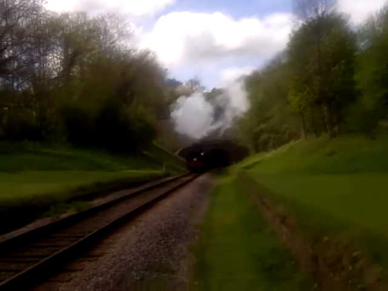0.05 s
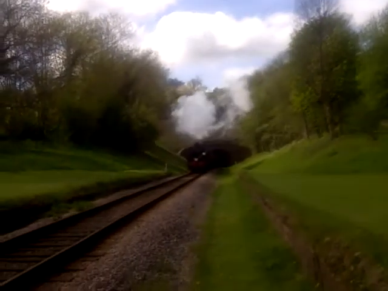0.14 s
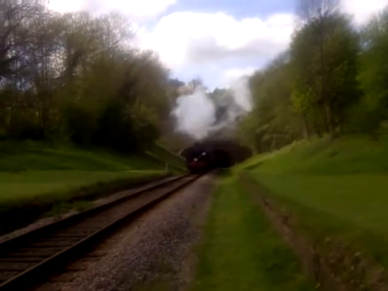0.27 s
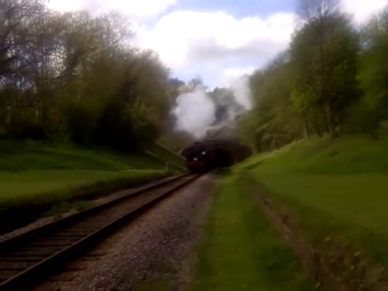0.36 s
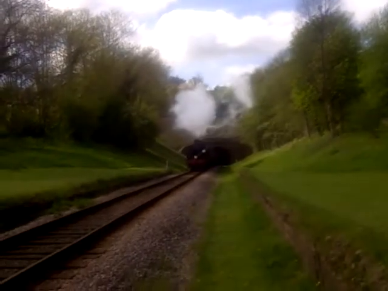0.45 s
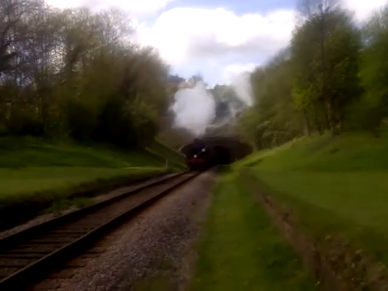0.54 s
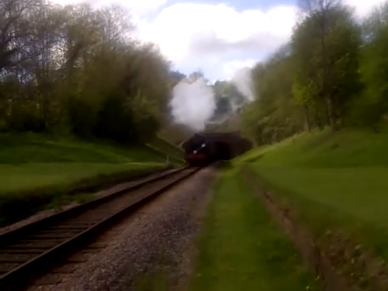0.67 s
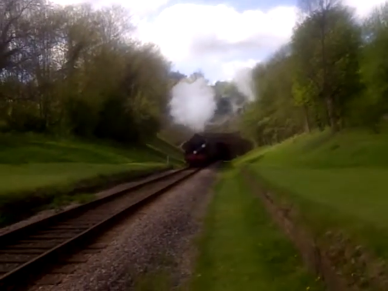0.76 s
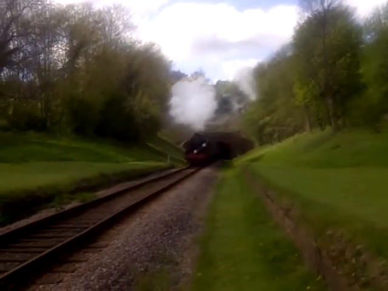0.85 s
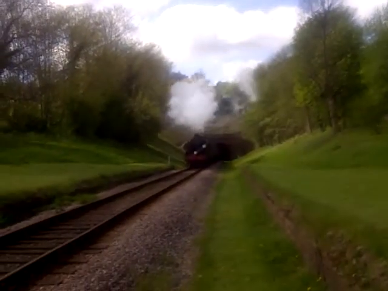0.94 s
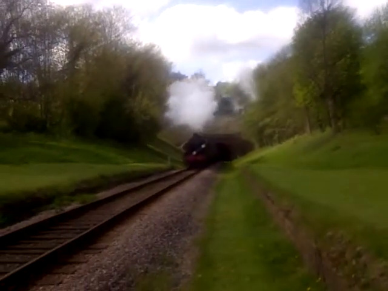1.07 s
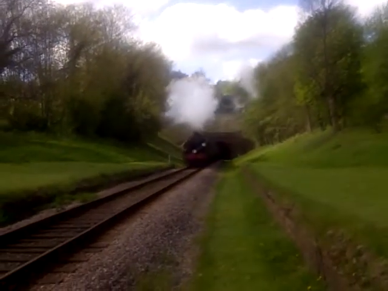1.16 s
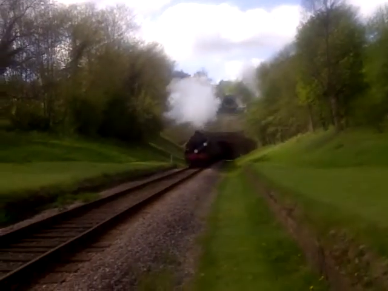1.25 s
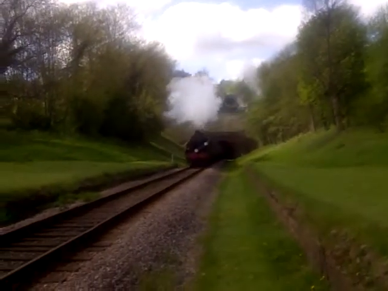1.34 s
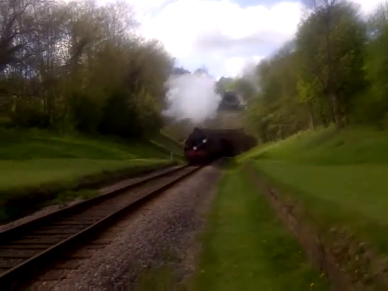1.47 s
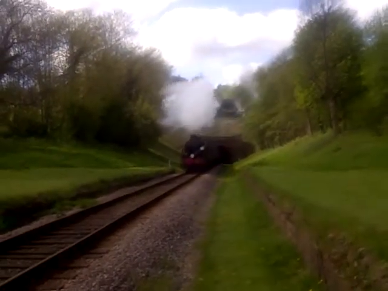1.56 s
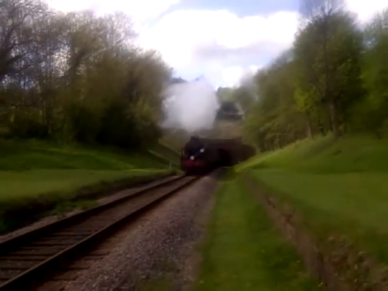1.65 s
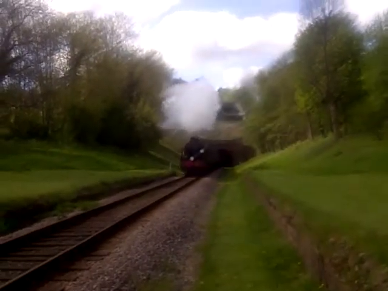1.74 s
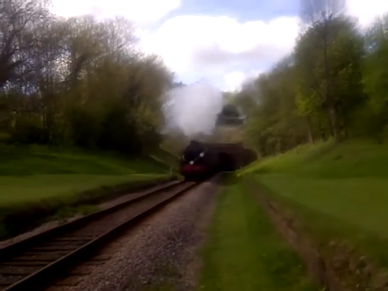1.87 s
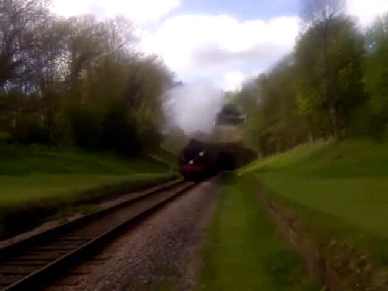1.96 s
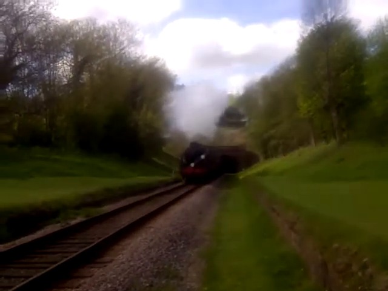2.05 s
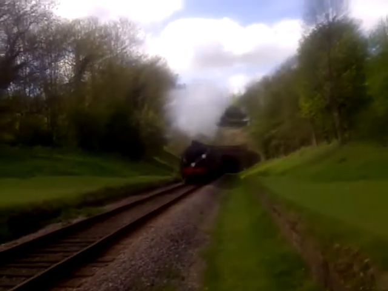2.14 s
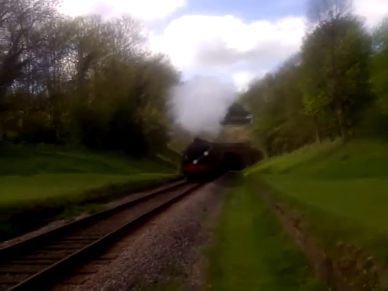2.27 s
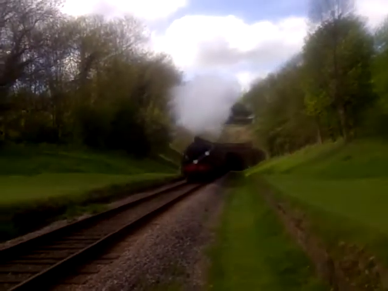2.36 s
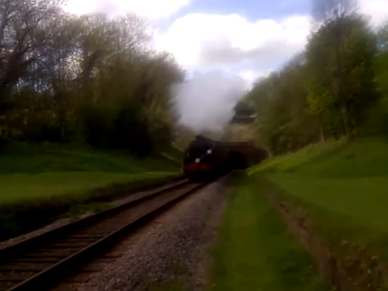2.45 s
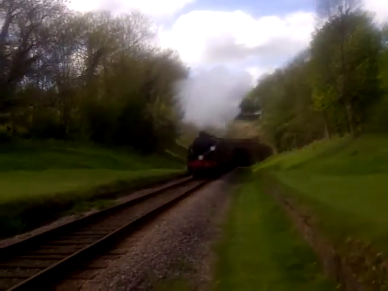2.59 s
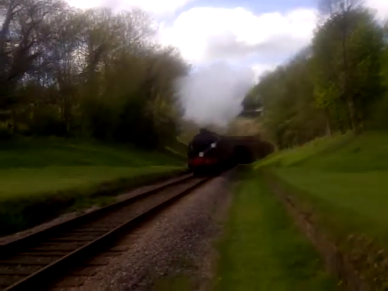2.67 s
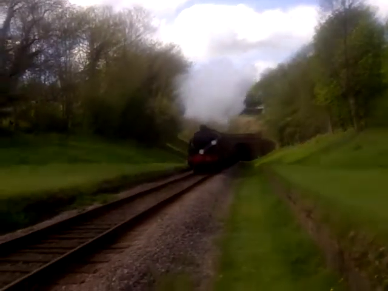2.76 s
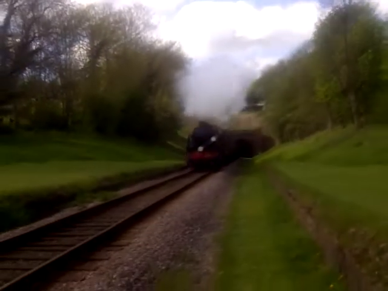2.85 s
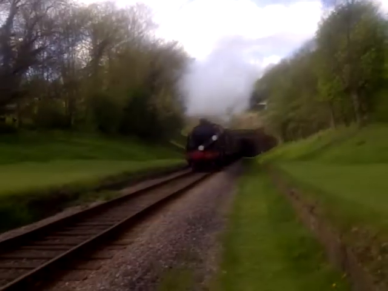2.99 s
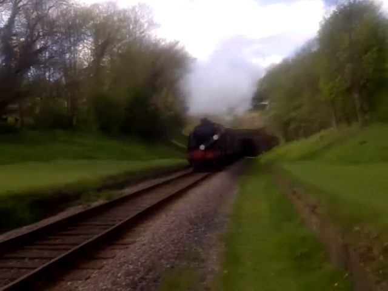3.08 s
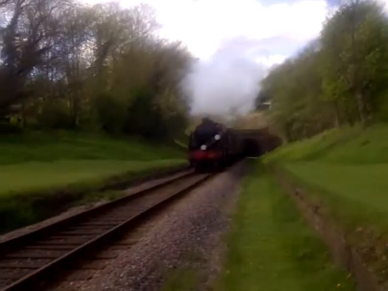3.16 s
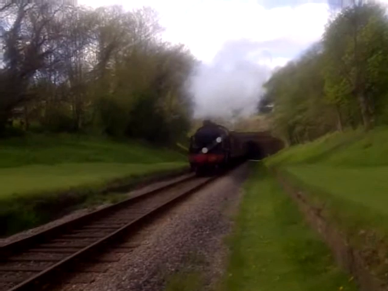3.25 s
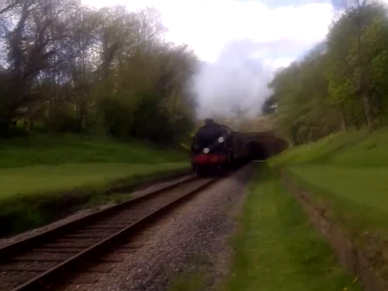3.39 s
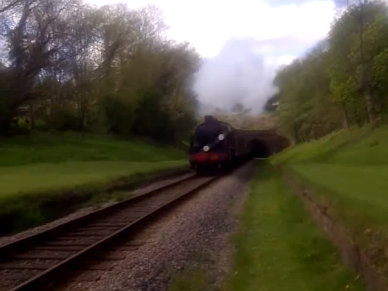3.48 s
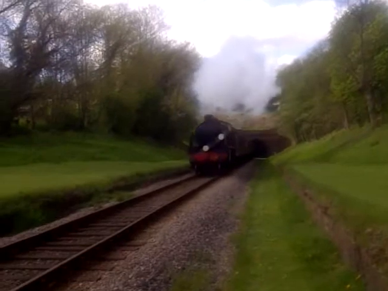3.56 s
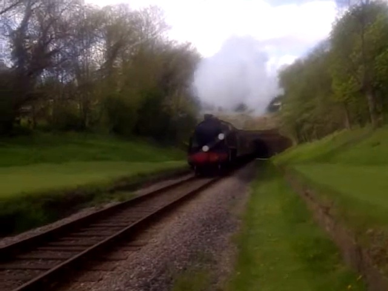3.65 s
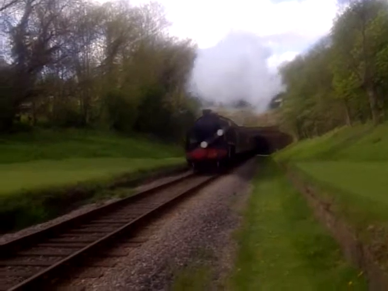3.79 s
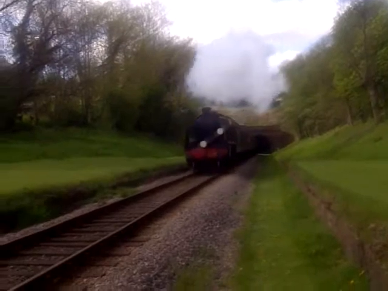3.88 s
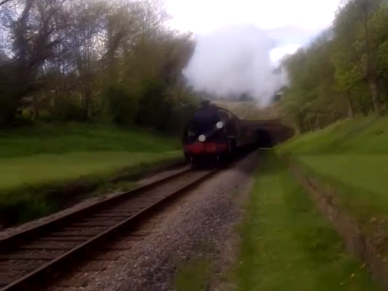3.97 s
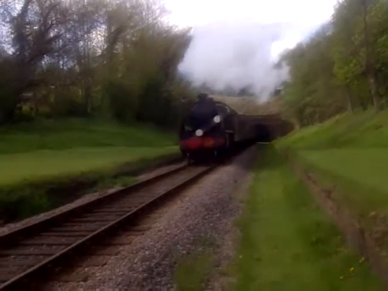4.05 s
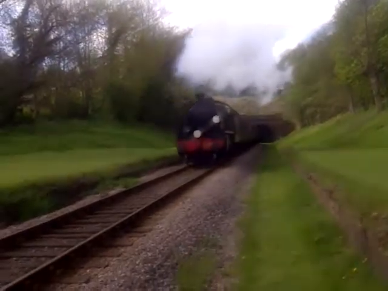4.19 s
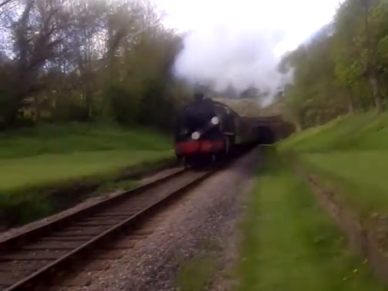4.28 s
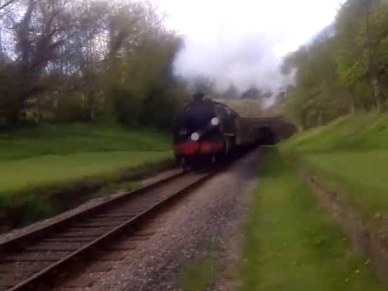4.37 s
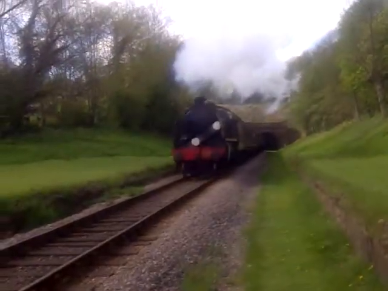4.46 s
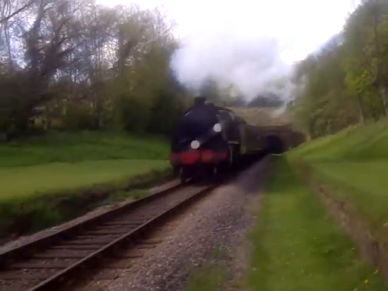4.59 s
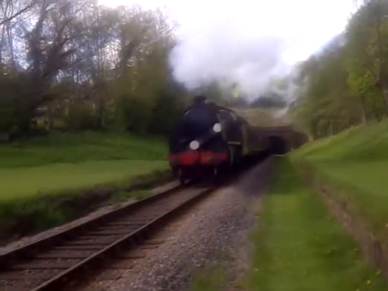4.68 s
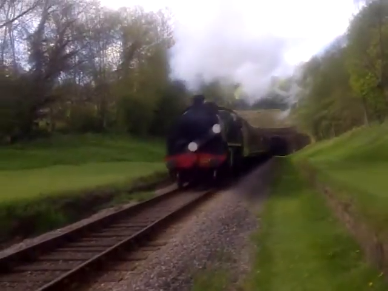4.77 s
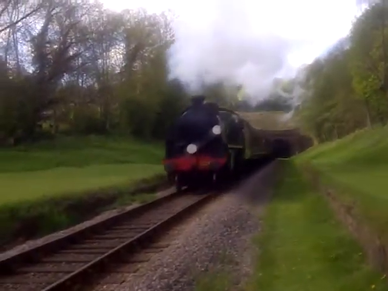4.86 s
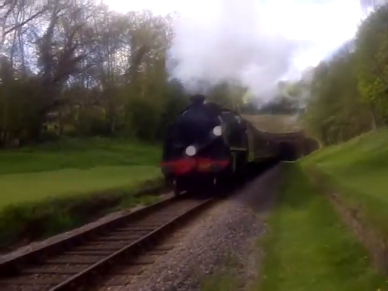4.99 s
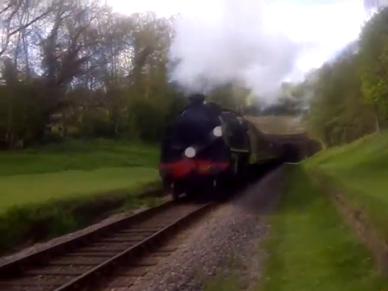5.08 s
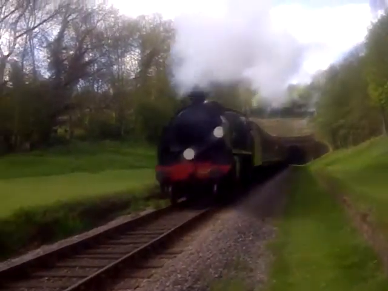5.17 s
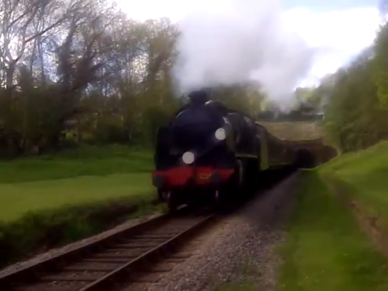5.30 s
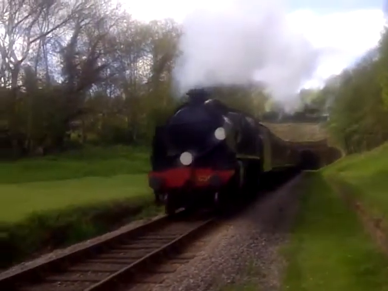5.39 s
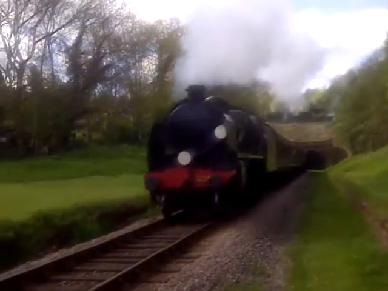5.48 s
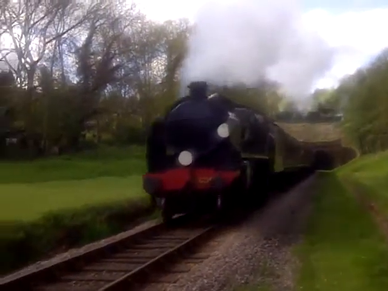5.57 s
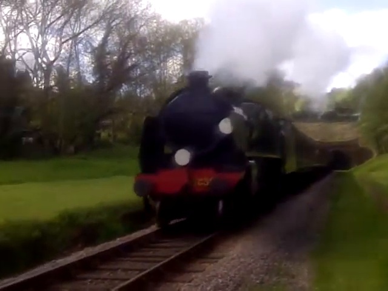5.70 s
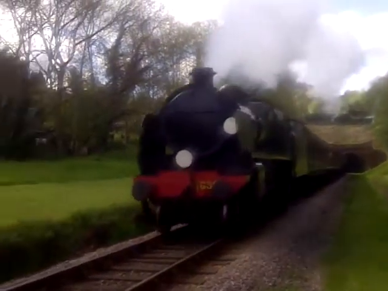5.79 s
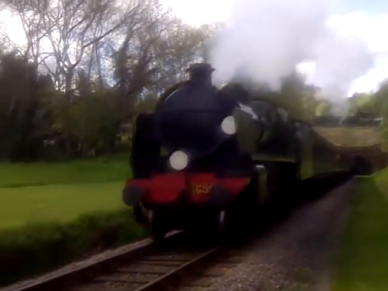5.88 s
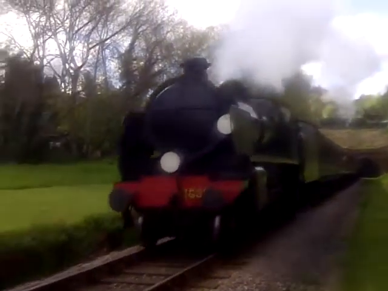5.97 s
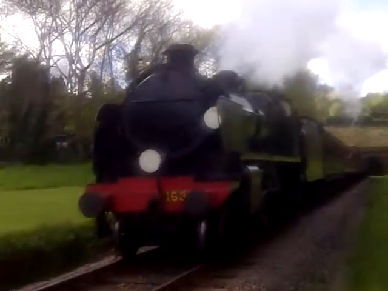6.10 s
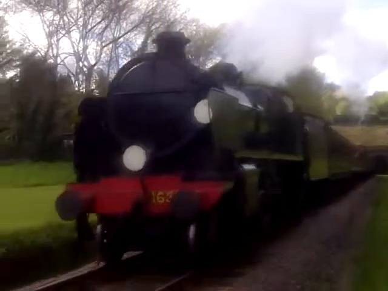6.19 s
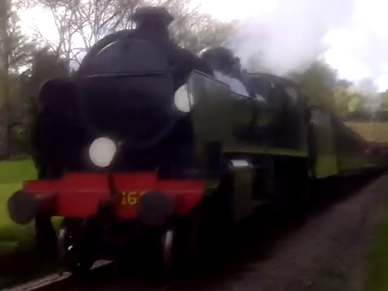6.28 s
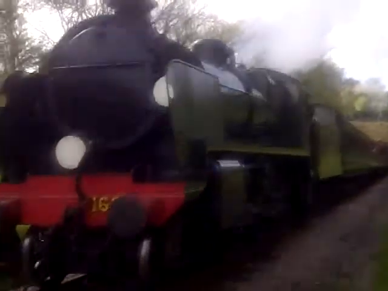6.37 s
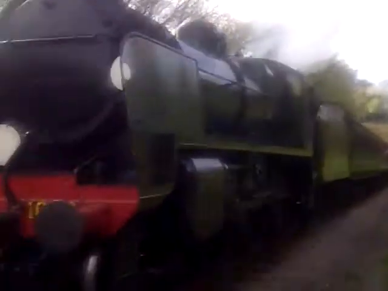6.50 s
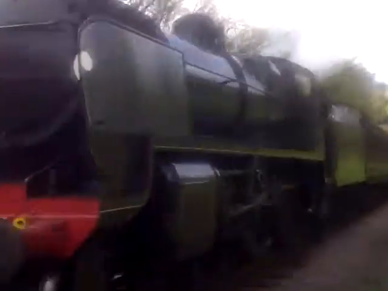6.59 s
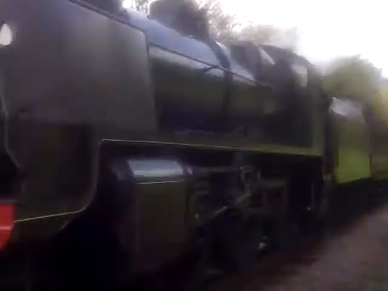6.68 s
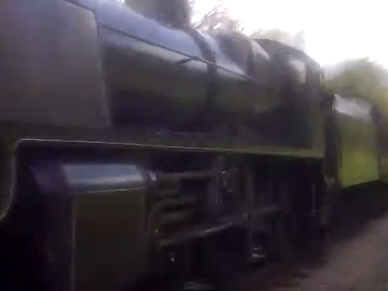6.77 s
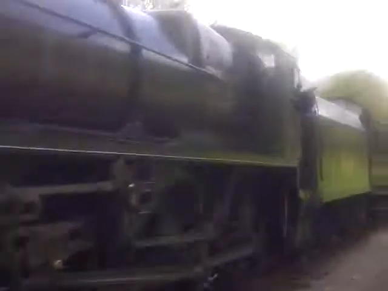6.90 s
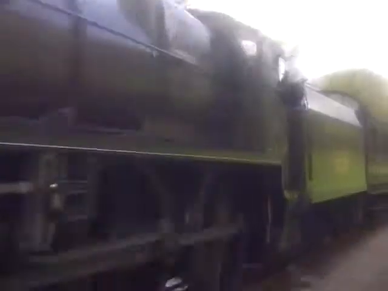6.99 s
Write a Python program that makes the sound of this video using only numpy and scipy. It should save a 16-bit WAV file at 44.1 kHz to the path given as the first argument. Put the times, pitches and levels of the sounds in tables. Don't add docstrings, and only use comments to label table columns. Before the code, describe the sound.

Outdoors beside a railway, quick throaty exhaust puffs bark in groups of four, the first sharpest, over a low rolling rumble that gradually grows. Occasional dry handling ticks sit very near. After about four and a half seconds the puffing fades, rail joints knock, then a hard bang leads into a loud rush of machinery, faint steel pings, low hums and steam hiss, cut off at its loudest. Limited, mono camera sound.

```python
import sys
import numpy as np
from scipy import signal
from scipy.fft import rfft, irfft, next_fast_len
from scipy.io import wavfile
from scipy.ndimage import uniform_filter1d, map_coordinates

SR = 44100
rng = np.random.default_rng(int(sys.argv[2]) if len(sys.argv) > 2 else 0)


def magnitude_from_level(level_db):
    exponent = np.asarray(level_db, float) / 20
    return 10 ** exponent


def int16_out(signal):
    q = np.round(np.clip(np.atleast_2d(signal).T, -1, 1) * 32767)
    wavfile.write(sys.argv[1], SR, q.astype(np.int16))


N = 310464
USUAL_DB = -29.5


def unit(x):
    return x / np.sqrt(np.mean(x ** 2) + 1e-20)


def along(points):
    f, v = np.transpose(points)
    return lambda hz: magnitude_from_level(np.interp(np.log(hz + 1), np.log(f + 1), v))


def resonant(modes):
    def response(f):
        total = 0
        for k, (centre, width, db) in enumerate(modes):
            mode = 1j * f * width / (centre * centre - f * f + 1j * f * width)
            total = total + (-1) ** k * magnitude_from_level(db) * mode
        return total
    return response


def wobble(rate):
    knots = rng.standard_normal(int(N * rate / SR) + 4)
    return map_coordinates(knots, [np.arange(N) * rate / SR])


def filtered(x, response):
    m = next_fast_len(N + SR // 2)
    return irfft(rfft(x, m) * response(np.fft.rfftfreq(m, 1 / SR)), m)[..., :N]


def rush(response, patchy_db):
    z = signal.stft(rng.standard_normal(N + 512), nperseg=512)[2]
    field = rng.standard_normal(z.shape)
    field = uniform_filter1d(uniform_filter1d(field, 4, 0), 5, 1)
    patchy = signal.istft(z * magnitude_from_level(patchy_db * unit(field)), nperseg=512)[1][:N]
    return unit(filtered(patchy, response))


def hump(u, rise, decay):
    attack = np.sin(np.pi / 2 * np.clip(u / rise, 0, 1)) ** 2
    return np.where(u < rise, attack, 1 / np.cosh((u - rise) / decay))


def bursts(rows):
    t = np.arange(N) / SR
    out = np.zeros((len(rows[0]) - 3, N))
    for s, *levels, rise, decay in rows:
        span = slice(max(round(s * SR), 0), round((s + rise + 8 * decay) * SR))
        out[:, span] += (magnitude_from_level(levels)[:, None] * hump(t[span] - s, rise, decay)) ** 2
    return np.sqrt(out)


# (time [s], level over the start [dB])
NEARNESS = [(0, -1.5), (.6, -0.1), (1.2, 1.5), (2, 4), (2.9, 4), (3.3, 4.5), (3.7, 5), (4.3, 7.5), (4.7, 7),
            (5.1, 5), (5.4, 4.5), (5.7, 7), (6, 10.5), (6.3, 11), (6.6, 15.5), (7.04, 14)]


def nearness(s):
    return np.interp(s, *np.transpose(NEARNESS))


# (crest of the first beat [s], bark of each of the four beats [dB])
TURNS = [(-.278, -60, -60, -31.5, -33.5), (0.211, -29, -31.5, -32.5, -32), (0.703, -30, -30, -32, -31.5),
         (1.193, -29.5, -30.5, -33.5, -32.5), (1.681, -30.5, -29, -31, -32),
         (2.171, -27, -30.5, -31.5, -30.5), (2.655, -27.5, -29.5, -30, -31.5),
         (3.143, -28.5, -30, -29.5, -32), (3.63, -27, -29, -31, -32.5), (4.105, -27, -31, -31, -30.5),
         (4.576, -27, -33, -35, -40), (5.03, -38, -64, -63, -60)]
# (lag in the turn [s], rise [s], decay [s], boom over bark [dB], hiss over bark [dB])
BEATS = [
    (-.002, 0.019, 0.031, 1.5, -11.5),
    (.143, 0.064, 0.022, -0.1, -12),
    (0.263, 0.06, 0.022, 3.2, -11),
    (0.374, 0.04, 0.024, 1.5, -12),
]


def beats():
    rows = []
    for s, *barks in TURNS:
        for db, (lag, rise, decay, boom_db, hiss_db) in zip(barks, BEATS):
            if s + lag > -.05:
                harder = db - USUAL_DB
                boom = db + boom_db + 0.27 * harder + 1.14 * (nearness(s + lag) - 3)
                hiss = db + hiss_db + 0.41 * harder
                rows.append((s + lag - rise, boom, db, hiss, rise, decay))
    return rows


# (centre [Hz], width [Hz], level [dB])
CHIMNEY = [(125, 40, -9), (206, 22, 3), (255, 50, -10), (340, 70, -8), (410, 50, -9), (580, 90, -15)]
# (centre [Hz], width [Hz], level [dB])
MOUTH = [(810.5, 66, 0.5), (878, 74, 3), (936, 101, 1), (1243, 133, 0), (1411, 186, -1), (1721, 220, -8)]
# (frequency [Hz], density [dB per Hz])
JET = [(1120, -19.5), (1900, 2.5), (2090, 4.5), (2630, -9), (4180, -15.5), (6100, -29.5), (7310, -51),
       (9500, -84), (16100, -120)]


def exhaust():
    bark, hiss = bursts([(s, *rest) for s, _, *rest in beats()])
    boom, = bursts([(s, db, rise, decay) for s, db, *_, rise, decay in beats()])
    eddies = wobble(70)
    deep = rush(lambda f: resonant(CHIMNEY)(f) / (1 + (f / 1500) ** 2), patchy_db=-1.56)
    throaty = rush(lambda f: resonant(MOUTH)(f) / (1 + (f / 3200) ** 4), patchy_db=1.0)
    low = boom * unit(magnitude_from_level(2.0 * eddies) * deep)
    mid = bark * unit(magnitude_from_level(1.9 * eddies) * throaty)
    return low + mid + hiss * unit(magnitude_from_level(1.6 * eddies) * rush(along(JET), patchy_db=.8))


# (centre [Hz], width [Hz], level [dB])
THROAT = [(290, 78, .1), (397, 88, -1.5)]


def thump():
    rows = [(s, db + 0.12 * nearness(s), rise, 0.63 * decay) for s, _, db, _, rise, decay in beats()]
    puff, = bursts(rows)
    return magnitude_from_level(-6.5) * puff * rush(lambda f: resonant(THROAT)(f) ** 2, patchy_db=1.5)


def banks(x):
    t = np.arange(SR // 2) / SR
    tail = rng.standard_normal(len(t)) * magnitude_from_level(-60 * t / 0.55) * (1 - np.exp(-t / 0.074))
    wet = signal.fftconvolve(x, tail / np.linalg.norm(tail))[:N]
    return filtered(wet, lambda hz: 1 / (1 + 1j * hz / 2500))


# (crest [s], thud [dB], clank [dB], thud pitch [Hz], decay [s])
JOINTS = [(4.549, -25, -35, 212, 0.012), (4.792, -25.5, -33, 285, .0047), (4.992, -25.5, -34, 292, 0.0034),
          (5.199, -25, -52, 268, 0.0098), (5.494, -28, -35, 207, 0.0092), (5.545, -38.5, -35.5, 156, 0.032),
          (5.668, -33, -37, 230, .015), (5.82, -37, -51, 209, 0.037), (5.853, -31.5, -50, 290, 0.0077),
          (6.1175, -12, -22, 210, 0.0041), (6.171, -27, -38, 225, 0.014), (6.362, -17.5, -23, 266, 0.0083),
          (6.495, -28.5, -43, 228.5, .024), (6.56, -21, -27.5, 340, 0.017), (6.577, -24.5, -37, 288, 0.016),
          (6.709, -39, -26.5, 343, .0084), (6.772, -36.5, -25, 347, .016), (6.823, -24.5, -25, 472, .017),
          (6.911, -37, -18.5, 440, 0.0076), (6.92, -17.5, -25, 441, 0.016)]


def blows():
    rows = []
    for s, db, clank_db, hz, decay in JOINTS:
        rise = max(0.02 - decay, .004)
        rows.append((s - rise, db, clank_db, hz, rise, decay))
    return rows


# (frequency [Hz], density [dB per Hz])
GROUND = [(13, -46.5), (22, -10.5), (59, 0.5), (92, -1), (110, -5.5), (140, -19.5), (240, -120)]
# (frequency [Hz], density [dB per Hz])
WHEELS = [(59, -38), (100, -8), (123, -1), (376, -6.5), (410, -6), (482, -7), (680, -12.5), (880, -44),
          (1500, -120)]
# (frequency [Hz], density [dB per Hz])
GEAR = [(380, -27), (650, -12), (756, -7.5), (850, -5.5), (1050, -7), (1130, -15), (1210, -5),
        (2000, -13.5), (2600, -48), (4400, -120)]
# (frequency [Hz], density [dB per Hz])
LEAK = [(1120, -29.5), (1900, -11.5), (2230, -2.5), (2610, -7.5), (4210, -15.5), (5540, -24), (7000, -39),
        (9100, -74.5), (15400, -120)]
# (level at the start [dB], growth with nearness [dB per dB], jolt after a joint [dB])
ROLLERS = [
    (-50.5, 0.74, -14),
    (-42, 0.63, -8.5),
    (-45, 0.9, -13.5),
    (-55, 0.98, -24.5),
]


def rolling():
    near_db = nearness(np.arange(N) / SR)
    jolts = [(s, USUAL_DB + 0.55 * (db - USUAL_DB), .03, 0.02) for s, db, *_ in blows()]
    jolt, = bursts(jolts)
    shake = 0.38 * wobble(10) + 0.19 * wobble(40)
    layers = [(GROUND, 1.2), (WHEELS, 2.2), (GEAR, 2.1), (LEAK, 1.3)]  # (colour, patchiness [dB])
    total = np.zeros(N)
    for (db, grows, jolt_db), (colour, patchy_db) in zip(ROLLERS, layers):
        gain = np.hypot(magnitude_from_level(db + grows * near_db), magnitude_from_level(jolt_db) * jolt)
        total += gain * unit(magnitude_from_level(shake) * rush(along(colour), patchy_db))
    return total


# (time [s], snap [dB], knock over snap [dB])
TICKS = [(.0874, -14.5, .5), (.2696, -41, 16), (.3142, -39, 15), (.343, -46, 18), (.547, -43, -1),
         (.6403, -42, 11), (.7857, -41, 8), (.9844, -40, 9), (1.009, -40, 1.2), (1.5289, -37, -4),
         (1.5325, -37, -4), (1.5494, -36, -1), (2.129, -37, 1.2), (2.4494, -44, 3), (2.47, -39, 6),
         (2.5114, -29.5, 6.5), (2.7338, -36, 12), (2.853, -38, 1.2), (3.0754, -38, 5), (3.357, -29, 5),
         (3.7685, -28, 6), (4.2358, -44, 5), (5.6181, -40, -1), (5.799, -46, .3)]
# (frequency [Hz], gain [dB])
CASE = [(1500, -31.5), (2500, 6.5), (4500, 3), (6500, -9), (8000, -19)]


def ticks():
    snap, knock, t = np.zeros(N + 1500), np.zeros(N + 1500), np.arange(1500) / SR
    tone = np.sin(2 * np.pi * 1300 * t) + 0.41 * np.sin(2 * np.pi * 2150 * t)
    knock_shape = tone * hump(t, 0.00059, .0011)
    for s, db, knock_db in TICKS:
        tail = magnitude_from_level(-16.5 - .35 * (db + 15)) * np.exp(-t / .005)
        rattle = rng.standard_normal(1500) * (np.exp(-t / .0004) + tail)
        start = round(s * SR)
        snap[start:][:1500] += magnitude_from_level(db + 1.5) * rattle
        knock[start:][:1500] -= magnitude_from_level(db + knock_db) * knock_shape
    return filtered(snap[:N], along(CASE)) + knock[:N]


# (multiple of the thud pitch [ratio], level [dB])
RAIL = [(.55, -15.5), (0.751, 1), (0.999, 5.5), (1.3, 4.5), (1.65, 0), (2.1, -2), (2.7, -5)]
# (frequency [Hz], density [dB per Hz])
CLANK = [(500, -25), (700, -5.5), (900, 6.5), (1400, 5), (2200, -9.5), (3500, -13), (6000, -37.5),
         (8000, -55.5)]


def joints():
    clank, = bursts([(s, db, rise, decay) for s, _, db, _, rise, decay in blows()])
    thuds, t = np.zeros(N + 6000), np.arange(6000) / SR
    for s, db, _, hz, rise, decay in blows():
        ring = np.zeros(len(t))
        for k, level in RAIL:
            luck = rng.standard_normal()
            partial = np.cos(2 * np.pi * hz * k * (t - rise) + .9 * luck)
            ring += magnitude_from_level(level + 1.5 * luck) * partial * hump(t, rise, decay) ** k
        thuds[round(s * SR):][:6000] -= magnitude_from_level(db - 7.5) * ring
    return thuds[:N] + clank * rush(along(CLANK), patchy_db=1.5)


# (time [s], roar [dB])
PASS = [(5.7, -56), (6.2, -37), (6.398, -32), (6.784, -22.5), (6.926, -21), (7.04, -21.5)]
# (frequency [Hz], density [dB per Hz])
ROAR = [(35, -35.5), (60, -16), (145, -11), (255, -1.5), (457, 0), (669, -4.5), (904, -5), (1130, -11.5),
        (1300, -2.5), (1940, -17), (2100, -12.5), (5300, -39), (7310, -45), (9500, -76.5), (16100, -120)]
# (frequency [Hz], density [dB per Hz])
STEAM = [(1760, -22), (3000, -2), (3320, -1.5), (5350, -5.5), (6730, -15.5), (7310, -37), (9500, -52.5),
         (16100, -120)]


def roar():
    roar_db = np.interp(np.arange(N) / SR, *np.transpose(PASS), left=-120)
    hiss = magnitude_from_level(-43.5 + 1.1 * (roar_db - roar_db[-1]))
    body = magnitude_from_level(roar_db) * unit(magnitude_from_level(2.4 * wobble(45)) * rush(along(ROAR), patchy_db=0.5))
    return body + hiss * rush(along(STEAM), patchy_db=-3.5)


# (time [s], level [dB], pitch [Hz])
PINGS = [(6.108, -40, 3430), (6.356, -35, 3430), (6.432, -39, 3000), (6.553, -38, 3400), (6.705, -38, 3380)]


def pings():
    t = np.arange(N) / SR
    total = np.zeros(N)
    for s, db, hz in PINGS:
        note = np.sin(2 * np.pi * hz * t) + 0.65 * np.sin(2 * np.pi * 0.95 * hz * t)
        total += magnitude_from_level(db) * note * hump(np.clip(t - s, 0, 1), .004, .006)
    return total


# (start [s], level [dB], pitch [Hz], rise [s], decay [s])
BOOMS = [
    (6.43, -24.5, 187.1, .015, .015),
    (6.86, -24, 147.4, 0.023, 0.019),
    (6.93, -26, 138.2, 0.065, 0.04),
]


def booms():
    t = np.arange(N) / SR
    waver = np.cumsum(wobble(30)) / SR
    total = np.zeros(N)
    for s, db, hz, rise, decay in BOOMS:
        hum = np.sin(2 * np.pi * hz * (t + 0.016 * waver))
        total += magnitude_from_level(db) * hum * hump(np.clip(t - s, 0, 1), rise, decay)
    return total


def scene():
    blast = exhaust()
    engine = blast + thump() + magnitude_from_level(-11) * banks(blast)
    passing = joints() + roar() + pings() + booms()
    return (engine + rolling() + ticks() + passing)[None]


def thin_treble(x, step_db, swing_db):
    hz, _, z = signal.stft(np.pad(x, (0, 1024), "reflect"), SR, nperseg=1024)
    size = np.abs(z)
    count = z.shape[1]
    moments = rng.standard_normal(count // 2 + 1).repeat(2)[:count]
    bands = rng.standard_normal((65, count // 4 + 1)).repeat(8, 0).repeat(4, 1)[:len(hz), :count]
    busy = uniform_filter1d(size[(hz > 3000) & (hz < 4500)].mean(0), 15)
    step = np.minimum(busy, 2.6 * np.median(busy)) * magnitude_from_level(step_db + swing_db * (moments + bands))
    kept = (size > step) | (hz[:, None] < 4800)
    return signal.istft(z * kept, SR, nperseg=1024)[1][:N]


def band_limit(x):
    return signal.sosfilt(signal.butter(12, 7460, fs=SR, output="sos"), x)


def record(dry):
    narrow = filtered(dry[0], lambda hz: 1 / np.sqrt(1 + (hz / 7180) ** 60))
    mix = thin_treble(narrow, step_db=-22.5, swing_db=8.5)[None]
    return band_limit(mix)


dry = scene()
out = record(dry)
int16_out(out)
```